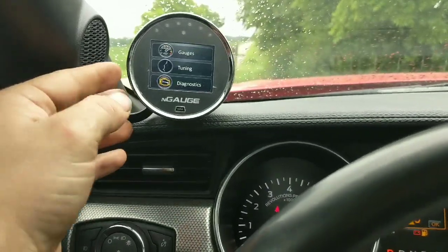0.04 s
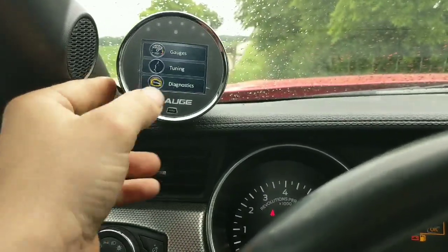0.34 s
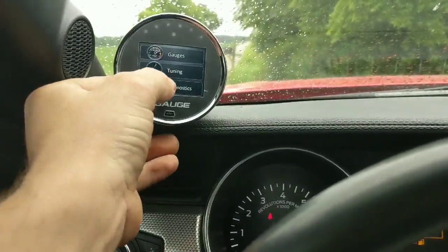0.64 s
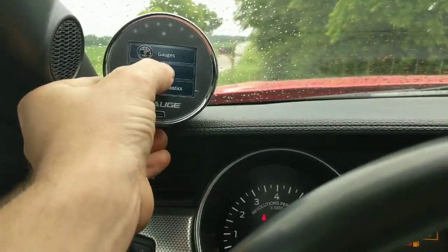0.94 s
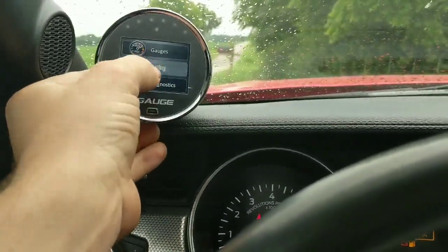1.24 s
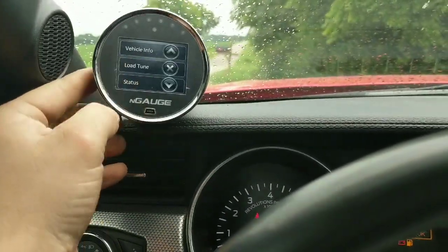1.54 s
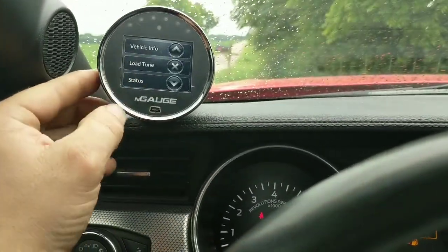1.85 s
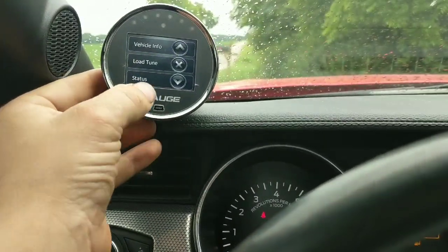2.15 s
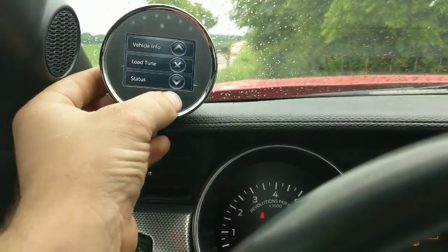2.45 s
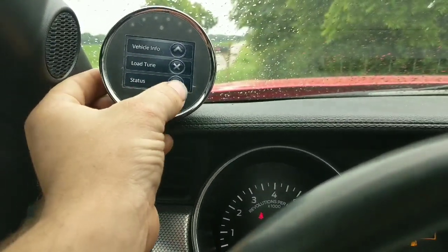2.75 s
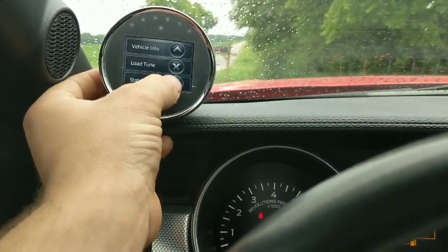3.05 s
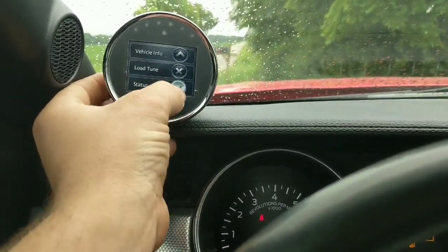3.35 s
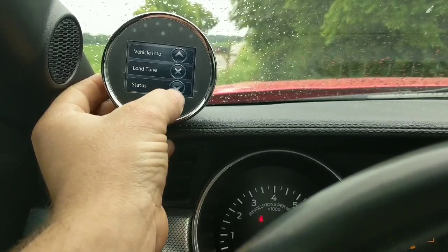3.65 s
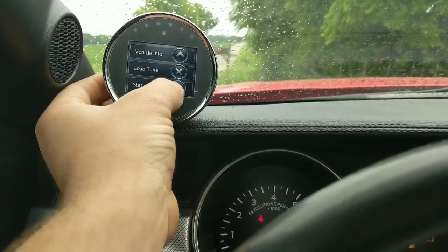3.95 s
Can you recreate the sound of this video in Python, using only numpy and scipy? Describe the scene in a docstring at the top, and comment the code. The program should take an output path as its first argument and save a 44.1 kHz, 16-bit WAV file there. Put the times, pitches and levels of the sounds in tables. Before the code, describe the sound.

Two sharp plastic clicks from a pressed touchscreen, over an idling car's low hum.

```python
"""A thumb works a small plastic touchscreen gauge, close to a hand-held microphone in a parked car.
It slides onto the screen, presses with a sharp click and lets go with another; both ring the housing.
The plastic ticks faintly under the grip, and the microphone takes a few dull bumps from the hand.
Behind it the idling car and its blower hum steadily, and light rain ticks on the windscreen.
Mono, in the short, dead acoustic of the cabin."""
import sys
import numpy as np
from scipy import signal
from scipy.fft import rfft, irfft, next_fast_len
from scipy.io import wavfile
from scipy.ndimage import uniform_filter1d

SR = 44100
rng = np.random.default_rng(int(sys.argv[2]) if len(sys.argv) > 2 else 0)


def wav_record(signal):
    """Record a signal, one row per channel, as 16-bit PCM in the file named by sys.argv[1]."""
    frames = np.transpose(np.atleast_2d(signal))
    bounded = np.clip(frames, -1, 1)
    # unit amplitude maps onto the largest positive 16-bit level
    quanta = np.round(bounded * 32767).astype(np.int16)
    wavfile.write(sys.argv[1], SR, quanta)


N = 176400
FFT_SIZE = next_fast_len(N + 8192)
BIN_HZ = np.fft.rfftfreq(FFT_SIZE, 1 / SR)

# idle rumble as heard inside the car (frequency [Hz], gain [dB])
IDLE_COLOUR = [(15, -77), (25, -27), (43, -21), (65, -4), (128, -0.5), (161, -1), (200, -0.5), (284, -7.5),
               (389, -15.5), (429, -22), (450, -19.5), (580, -46), (990, -120)]
# even hiss in the cabin (frequency [Hz], gain [dB])
HISS_COLOUR = [(200, -2), (450, 1), (750, -1.5), (1200, -6.5), (1700, -5), (2400, -10.5), (4500, -14.5),
               (7600, -17.5), (8600, -22), (15500, -21.5)]
# blower resonances (centre [Hz], half-width [Hz], level [dB])
BLOWER_RESONANCES = [(188.7, 30.6, -61.5), (602.5, 44, -68), (883, 52, -68), (966, 56, -62.5),
                     (1409, 41, -75)]
# treble loss through the windscreen (frequency [Hz], gain [dB])
WINDSCREEN_LOSS = [(7500, -7), (8800, -16), (15000, -39)]
# single raindrops on the glass (time [s], peak level [dB], centre [Hz], half-width [octaves])
RAINDROPS = [(1.1496, -40.5, 6600, 0.45), (1.1543, -52, 6600, 0.22), (1.1731, -48, 6300, .2),
             (2.3912, -35, 4940, 0.83), (3.2937, -39.5, 5400, 0.39), (3.3357, -55, 6000, .4)]
# skin sliding on the screen (frequency [Hz], gain [dB])
SLIDE_COLOUR = [(500, -3), (4200, -3), (5600, 4), (7500, -1), (8800, -13), (15000, -21)]
# the hand rubbing on the housing (time [s], length [s], level [dB])
GRIP_RUBS = [(0.49, 0.16, -74), (0.528, 0.029, -53.5), (0.571, 0.032, -51), (0.63, 0.14, -61.5),
             (2.294, 0.055, -59.5), (3.16, 0.075, -66)]
# skin on the housing (frequency [Hz], gain [dB])
GRIP_RUB_COLOUR = [(150, 6), (550, 4.5), (1300, -6), (3000, -14), (7500, -19), (9000, -32)]
# ticks of the gripped plastic (time [s], level [dB], t60 [s], tilt [dB/octave])
PLASTIC_TICKS = [(0.517, -58, 0.023, -2), (0.561, -49, 0.028, -11), (0.573, -55, 0.024, -5),
                 (0.669, -56, 0.078, 0), (1.098, -57, 0.044, -1), (1.247, -50.5, 0.029, -1.5),
                 (1.319, -53.5, 0.032, 1.5), (2.649, -53.5, 0.02, 0), (2.720, -58, .03, 0.5),
                 (2.996, -53, 0.054, -4), (3.0225, -59, .02, 2), (3.0285, -47, 0.023, 1.5),
                 (3.147, -50.5, 0.035, -6.5), (3.309, -47.5, 0.043, -2), (3.3137, -50.5, 0.021, -1),
                 (3.6735, -47.5, 0.023, 0.5)]
# one such tick before its tilt (frequency [Hz], gain [dB])
TICK_COLOUR = [(200, -33), (600, 1.5), (1600, 4.5), (2600, -3.5), (4200, -4), (7500, -14), (9000, -21),
               (15000, -28)]
# the hand knocking the microphone's body (time [s], frequency [Hz], level [dB])
MIC_BUMPS = [(0.533, 160, -29.5), (0.581, 108, -31.5), (2.182, 92, -28.5), (2.229, 93, -29.5),
             (2.432, 80, -38)]
# rumble of the grip shifting on the microphone (time [s], length [s], level [dB])
MIC_RUMBLES = [(0.61, .06, -62), (1.26, 0.06, -58), (2.25, 0.16, -48.5), (2.43, .1, -50)]
# tone of that rumble (frequency [Hz], gain [dB])
MIC_RUMBLE_COLOUR = [(30, -9), (60, -4), (110, -8), (250, -25), (600, -60)]
# press, then release (time [s], snap level [dB], crack level [dB], crack t60 [s], ring level [dB])
SCREEN_CLICKS = [(0.7513, -23.5, -33.5, 0.014, -37.5), (1.1780, -48, -40.5, 0.037, -41.5)]
# a click's sharp spike (frequency [Hz], gain [dB])
SNAP_COLOUR = [(500, -23), (2000, -6), (3300, 8), (4400, 1), (5500, -2), (7800, -4.5), (9000, -28),
               (15000, -11.5)]
# a click's burst of noise (frequency [Hz], gain [dB])
CRACK_COLOUR = [(300, -21), (1200, 1), (2200, -3), (3500, -5), (5500, -11), (7600, -10.5), (8600, -18),
                (15000, -25)]
# modes of mount and housing (frequency [Hz], t60 [s], gain on press [dB], gain on release [dB])
HOUSING_MODES = [(130, 0.1, 9, -6), (310.5, 0.015, 13.5, 24.5), (432, 0.016, 5.5, 6.5), (576, 0.058, 2, 4),
                 (788, 0.02, 0, 4.5), (1044, 0.026, 0, -2), (1353, 0.039, 0, -2), (1560, 0.037, -10, 0.5),
                 (1990, 0.04, -5.5, -1), (2310, .035, -15, -5.5), (3314, 0.018, -4, -9),
                 (4080, 0.028, -4, 6), (4300, 0.024, -4.5, -5), (5090, 0.042, -8, -4),
                 (6340, .026, -7.5, 0), (6900, .028, -16, -2), (7590, .026, -11, -0.5)]


def amp(db):
    return 10 ** (np.asarray(db) / 20)


def unit_rms(x):
    return x / np.sqrt(np.mean(x ** 2) + 1e-20)


def octaves(hz):
    """Signed distance of each FFT bin from hz."""
    return np.log2((BIN_HZ + 1) / hz)


def colour(points):
    """Gain per FFT bin from (frequency [Hz], gain [dB]) points on a log axis."""
    hz, db = np.transpose(points)
    return amp(np.interp(np.log(BIN_HZ + 1), np.log(hz + 1), db))


def filtered(x, gain):
    return irfft(rfft(x, FFT_SIZE) * gain, FFT_SIZE)[:N]


def noise(gain):
    """Coloured noise of rms 1."""
    return unit_rms(filtered(rng.standard_normal(N), gain))


def impulse(gain):
    """A minimum-phase click of peak 1 with the given colour."""
    cepstrum = irfft(np.log(gain + 1e-6), FFT_SIZE)
    cepstrum[1:FFT_SIZE // 2] *= 2
    cepstrum[FFT_SIZE // 2:] = 0
    tick = irfft(np.exp(rfft(cepstrum)), FFT_SIZE)[:SR // 100]
    return tick / np.abs(tick).max()


def strike(t, rise_s, t60):
    """Quick rise, exponential decay."""
    return (1 - np.exp(-t / rise_s)) * np.exp(-np.log(1000) * t / t60)


def swells(rows):
    """Bell-shaped swells from (time [s], length [s], level [dB]) rows."""
    t = np.arange(N) / SR
    return sum(amp(db) * np.exp(-(2 * (t - at) / length) ** 2) for at, length, db in rows)


def add(track, at_s, sound):
    part = track[round(at_s * SR):][:len(sound)]
    part += sound[:len(part)]


def idle_and_blower(idle_db=-51, hiss_db=-62, skirt=3.25):
    """The cabin's room tone: low idle rumble, narrow blower resonances and an even hiss."""
    blower = sum(amp(db) * noise(1 / (1 + np.abs((BIN_HZ - hz) / width) ** skirt))
                 for hz, width, db in BLOWER_RESONANCES)
    idle = amp(idle_db) * noise(colour(IDLE_COLOUR))
    hiss = amp(hiss_db) * noise(colour(HISS_COLOUR))
    return idle + hiss + blower


def raindrop(hz, width_octaves):
    """One drop strikes the windscreen: a bright impulse, heard through the glass."""
    return impulse(colour(WINDSCREEN_LOSS) / (1 + (octaves(hz) / width_octaves) ** 2))


def rain(drops_per_s=20, patter_db=-55.5, scatter_db=3):
    """Light rain from inside the car: a few drops stand out from a faint random patter."""
    hits = rng.random(N) < drops_per_s / SR
    peaks = amp(patter_db + scatter_db * rng.standard_normal(N))
    out = signal.fftconvolve(hits * peaks, raindrop(hz=4300, width_octaves=1))[:N]
    for at, db, hz, width in RAINDROPS:
        add(out, at, amp(db) * raindrop(hz, width))
    return out


def skin_friction(start_s=0.423, end_s=0.526, fade_s=0.015, slide_db=-62.5, grain_db=2):
    """Skin drags grainily over the gauge: a bright slide on the screen, duller rubs on the housing."""
    t = np.arange(N) / SR
    roughness = unit_rms(uniform_filter1d(rng.standard_normal(N), size=60))
    stroke = np.clip(np.minimum(t - start_s, end_s - t) / fade_s, 0, 1)
    slide = amp(slide_db) * stroke * noise(colour(SLIDE_COLOUR))
    rubs = swells(GRIP_RUBS) * noise(colour(GRIP_RUB_COLOUR))
    return amp(grain_db * roughness) * (slide + rubs)


def plastic_ticks(rise_s=0.0001):
    """Small slips of the plastic under the fingers, each a short burst of noise."""
    out, t = np.zeros(N), np.arange(SR // 8) / SR
    octaves_up = np.maximum(octaves(TICK_COLOUR[0][0]), 0)
    for at, db, t60, tilt in PLASTIC_TICKS:
        slip = noise(colour(TICK_COLOUR) * amp(tilt * octaves_up))[:len(t)]
        add(out, at, amp(db) * slip * strike(t, rise_s, t60))
    return out


def mic_handling(rise_s=0.0023, t60=0.046):
    """The hand right on the microphone's body: soft, quickly damped thuds over a loose rumble."""
    t = np.arange(SR // 4) / SR
    out = swells(MIC_RUMBLES) * noise(colour(MIC_RUMBLE_COLOUR))
    for at, hz, db in MIC_BUMPS:
        thud = strike(t, rise_s, t60) * np.sin(2 * np.pi * hz * t)
        add(out, at, -amp(db) * thud)
    return out


def screen_clicks(snap_lag_s=0.0006, crack_rise_s=0.00044, ring_rise_cycles=0.59, ring_lag_cycles=0.5):
    """Close up, the screen snaps in and out: a crack and a spike, then the housing rings, low modes last."""
    out, t = np.zeros(N), np.arange(SR // 4) / SR
    for click, (at, snap_db, crack_db, crack_t60, ring_db) in enumerate(SCREEN_CLICKS):
        add(out, at + snap_lag_s, amp(snap_db) * impulse(colour(SNAP_COLOUR)))
        crack = noise(colour(CRACK_COLOUR))[:len(t)] * strike(t, crack_rise_s, crack_t60)
        add(out, at, amp(crack_db) * crack)
        for hz, t60, *mode_db in HOUSING_MODES:
            ring = strike(t, ring_rise_cycles / hz, t60) * np.sin(2 * np.pi * hz * t)
            add(out, at + ring_lag_cycles / hz, amp(ring_db + mode_db[click]) * ring)
    return out


def cabin(x, rise_s=0.00067, t60=0.083, tail_db=-9, low_hz=590):
    """Direct sound plus the small cabin's short, dead tail, which thins out below low_hz."""
    t = np.arange(SR // 5) / SR
    bass_loss = amp(9 * np.minimum(octaves(low_hz), 0))  # 9 dB per octave
    tail = noise(bass_loss)[:len(t)] * strike(t, rise_s, t60)
    reflections = signal.fftconvolve(x, tail / np.linalg.norm(tail))[:N]
    return x + amp(tail_db) * reflections


def scene():
    """At the microphone: clicks, ticks and rain with the cabin's reflections, the rest dry."""
    impacts = cabin(screen_clicks() + plastic_ticks() + rain())
    return (impacts + skin_friction() + mic_handling() + idle_and_blower())[None]


def record(dry, low_cut_hz=40, top_hz=15800):
    """The hand-held microphone sheds the deepest bass and passes nothing above top_hz."""
    low_cut = signal.butter(4, low_cut_hz, "highpass", fs=SR, output="sos")
    return filtered(signal.sosfilt(low_cut, dry[0]), BIN_HZ < top_hz)[None]


dry = scene()
out = record(dry)
wav_record(out)
```